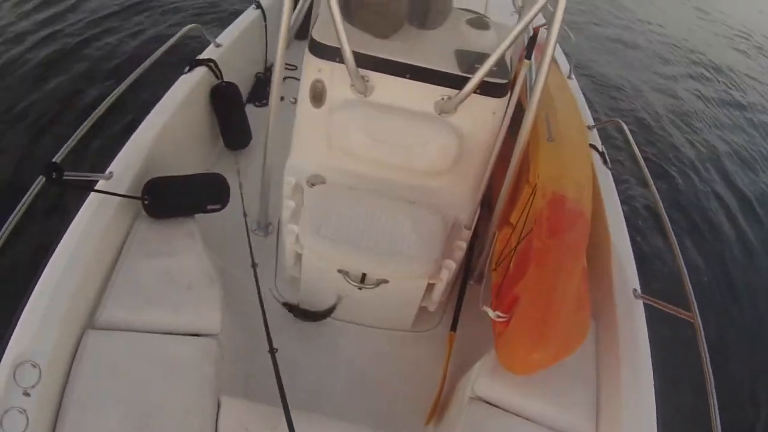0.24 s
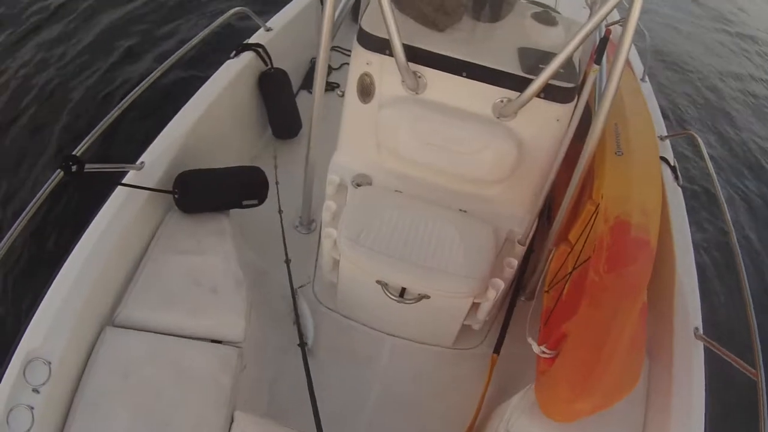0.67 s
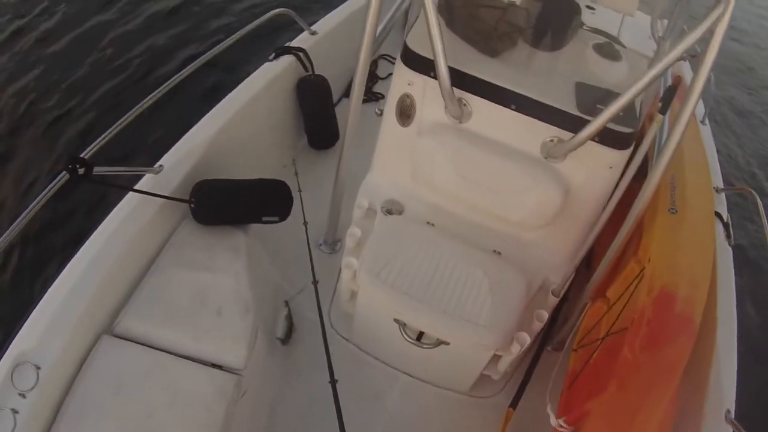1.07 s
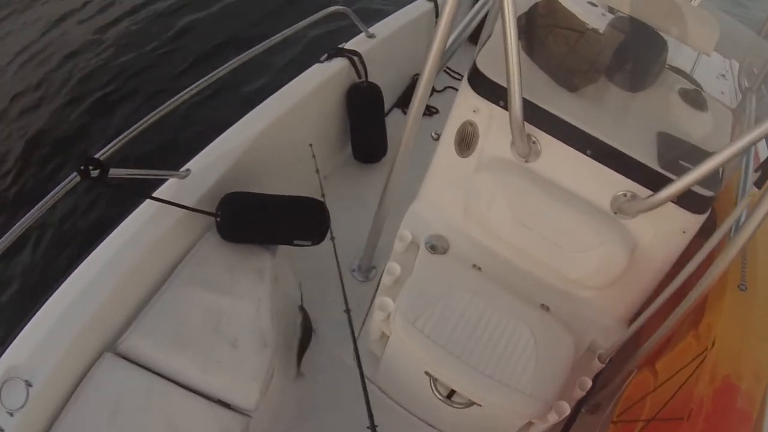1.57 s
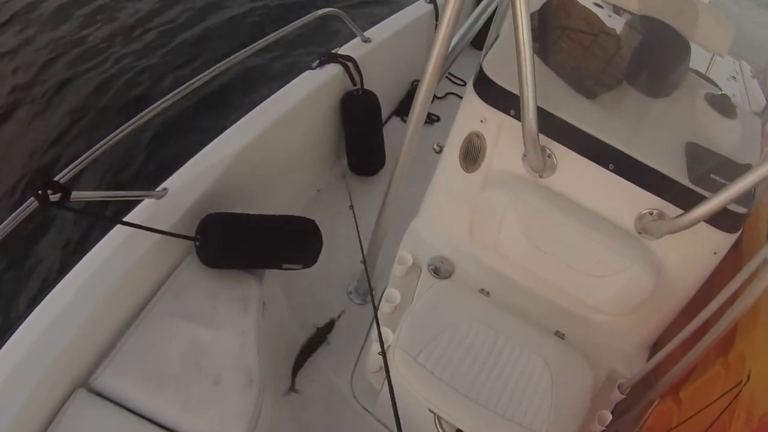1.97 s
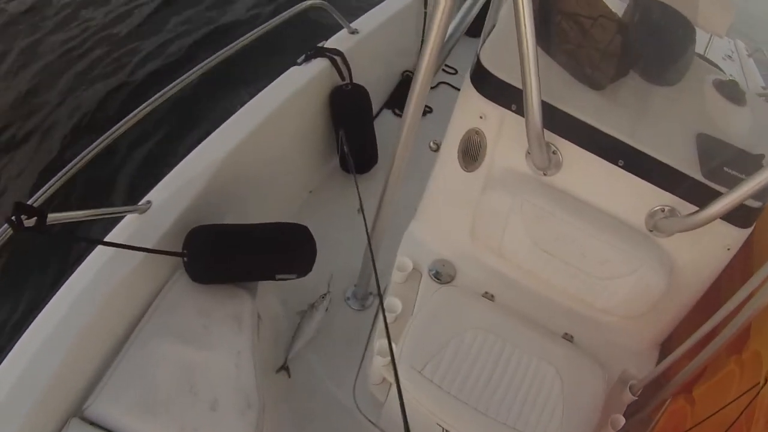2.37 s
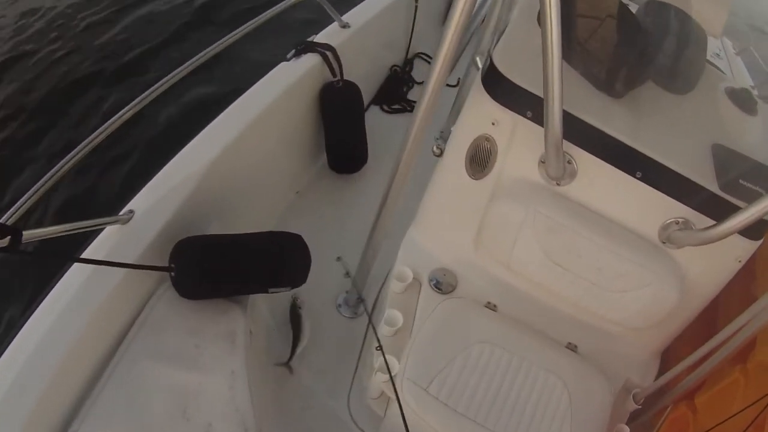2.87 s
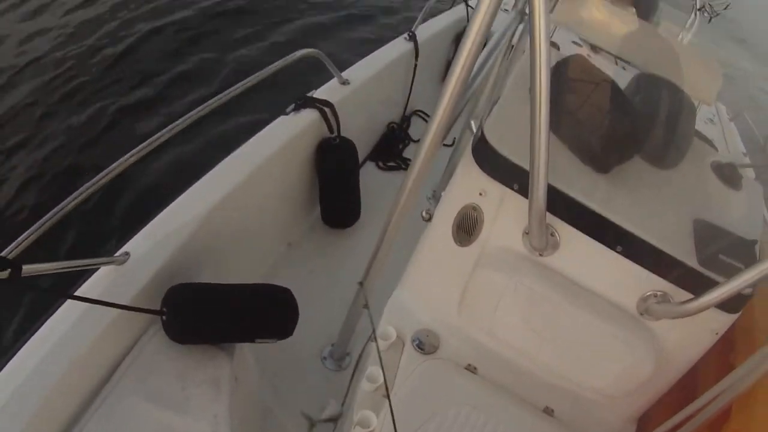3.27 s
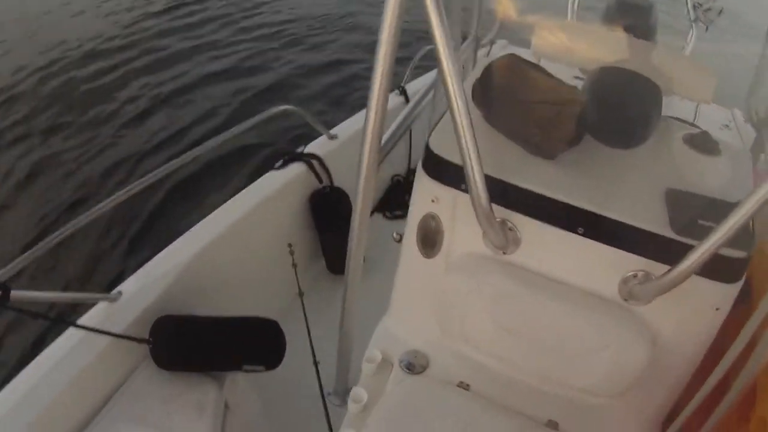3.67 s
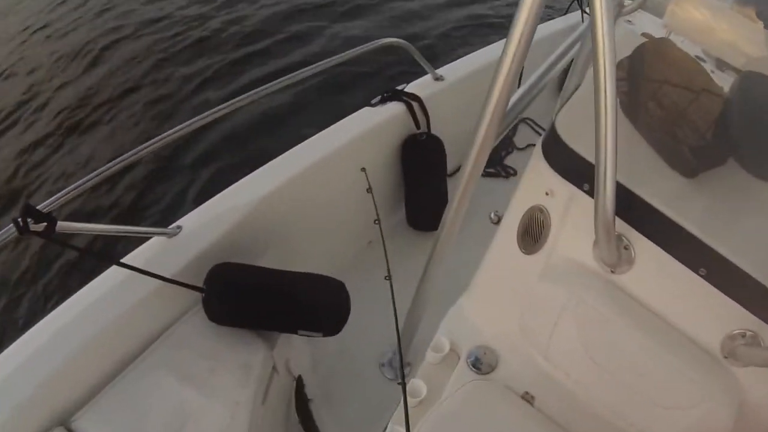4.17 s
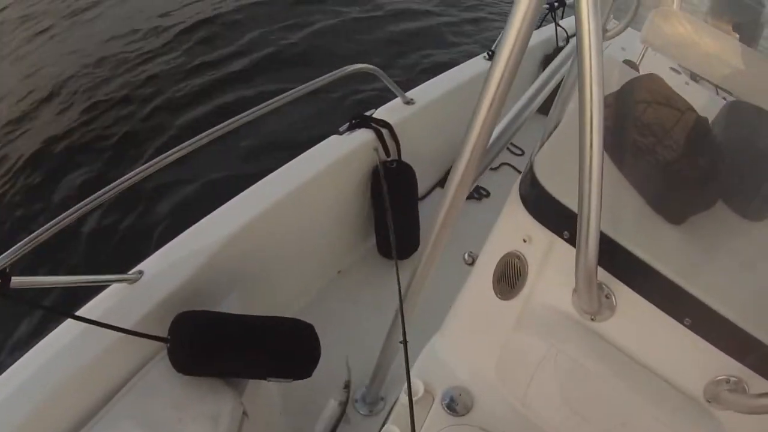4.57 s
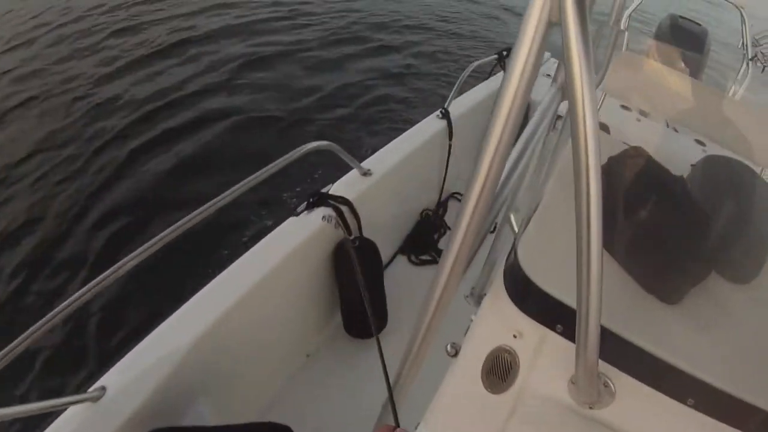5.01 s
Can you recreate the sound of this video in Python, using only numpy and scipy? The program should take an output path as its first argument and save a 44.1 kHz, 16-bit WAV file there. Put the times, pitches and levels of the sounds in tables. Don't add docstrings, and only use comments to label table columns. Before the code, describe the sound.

A freshly landed fish thrashes on the hollow fiberglass deck of a small boat, heard closely but muffled and boxy through a closed, body-worn camera housing. Lumpy sub-bass engine rumble, soft water wash on the hull and faint, slightly wide hiss continue throughout. From 0.1 to 0.6 s there are light bony taps, soft hollow thuds and a faint scrape. Small wet slaps start around 1.0 s, then a full fall lands at 1.2 s with a loud, hard smack, followed by slaps and a deep thud until 1.8 s. A lull holds only sparse taps near 2.4 and 2.9 s. At 3.4 s hard slaps and scrapes return; two heavy low bumps at about 3.55 and 3.63 s jolt the mount, with a click and faint high ping. A slap lands at 3.9 s, taps at 4.1-4.2 s, bright wet slaps with thin metal pings around 4.5-4.8 s, and a last deep bump near 4.97 s.

```python
import sys
import numpy as np
from scipy import signal
from scipy.fft import rfft, irfft
from scipy.io import wavfile
from scipy.ndimage import uniform_filter1d

SR = 44100
rng = np.random.default_rng(int(sys.argv[2]) if len(sys.argv) > 2 else 0)


def to_wav(sig):
    pcm = np.clip(np.atleast_2d(sig), -1, 1) * 32767
    pcm = np.round(pcm).astype(np.int16)
    wavfile.write(sys.argv[1], SR, pcm.T)


def boost(x):
    u = np.asarray(x, float) / 20
    return 10 ** u


N = 231354

# centre [Hz], width [Hz], lift [dB].
HOUSING = [(1320, 177, 8), (2030, 250, 6.5), (2342, 120, 5), (3250, 610, 1), (4740, 660, 1), (6000, 170, 1),
           (11260, 480, 4)]
# frequency [Hz], density [dB per Hz].
APART = [(60, -26), (300, -1), (1000, 0), (2000, -1.5), (3000, 1.5), (6000, -0.5), (9200, -4.5),
         (9800, -10), (13000, -18), (15000, -30)]
APART_DB = -79
# frequency [Hz], density [dB per Hz].
WASH = [(50, -38), (90, 5), (160, 0.5), (250, -3.5), (400, -5.5), (630, -8), (1000, -12), (1600, -13),
        (2600, -14.5), (4000, -18), (8000, -26), (12500, -34), (14300, -39), (15300, -43)]
# time [s], level [dB].
SEA = [(0, -57), (.2, -57), (.75, -57.5), (1.3, -59.5), (1.55, -58.5), (1.75, -55.5), (2.05, -57.5),
       (3.2, -59), (3.47, -55.5), (3.75, -59), (4.03, -58), (4.4, -60), (5.25, -59.5)]
SLOSH_DB, SLOSH_FOLLOWS = -58, 0.17
# frequency [Hz], density [dB per Hz].
SWAY = [(4.7, -29), (8.0, 2.5), (32, 4.5), (52, -2.5), (61, -12.5), (70, -19), (103, -26), (150, -29.5),
        (200, -45.5), (330, -120)]
# time [s], level [dB].
IDLE = [(0, -51), (1.7, -55), (1.9, -48.5), (3.2, -48.5), (3.5, -48.5), (5.25, -50.5)]
# centre [s], level [dB], half length [s].
HEAVES = [(.18, -47.5, .06), (.38, -40.5, 0.039), (.6, -42.5, 0.032), (.92, -43.5, 0.064),
          (1.14, -49, 0.037), (1.32, -45.5, 0.087), (1.7, -43.5, 0.077), (2.96, -44.5, 0.033),
          (3.3, -41, 0.093), (3.6, -37.5, .12), (3.83, -41, 0.032), (3.98, -44.5, .04), (4.07, -44.5, .05),
          (4.33, -45.5, 0.083), (4.75, -43, 0.18), (4.98, -34.5, 0.042), (5.14, -42, 0.031)]
# centre [s], level [dB], half length [s].
HUM = [
    (2.83, -65, 0.27),
    (3.95, -60, 0.083),
    (3.5, -68, .3),
    (4.8, -70, 0.54),
]
HUM_HZ = 159
# start [s], level [dB], rise [s], t60 [s], pitch [Hz].
PINGS = [
    (3.556, -56, 0.027, 0.13, 11150),
    (3.56, -63, .02, 0.1, 10950),
    (4.714, -57, .008, .2, 4470),
    (4.741, -50, .012, 0.17, 4480),
    (4.765, -52.5, 0.0092, .22, 4462),
    (4.712, -67, .005, .2, 12450),
    (4.785, -60, .01, .08, 5900),
]
# centre [s], level [dB], rate [Hz], direction.
JOLTS = [(1.266, -39.5, 91, -1), (1.359, -35.5, 33.4, 1), (2.325, -40, 140, -1), (3.251, -34.5, 30, 1),
         (3.278, -36, 126, 1), (3.542, -32, 70, 1), (3.698, -23, 27.8, 1), (3.715, -39, 30, -1),
         (3.842, -31.5, 28.8, 1), (4.951, -32, 30, 1), (5.021, -33.5, 35, 1)]
# start [s], drop [dB], drop [Hz], rebound [dB], rebound [Hz].
BUMPS = [
    (3.5512, -22.5, 45.6, -13.5, 31.6),
    (3.6311, -12, 41.7, -11, 35.8),
    (4.967, -21, 36.4, -14, 35.2),
]
REBOUND_S = 0.016
# time [s], tick [dB], kink [dB], direction.
TICKS = [
    (3.631, -44, -19.5, -1),
    (3.648, -48, -21.5, 1),
]
# frequency [Hz], level [dB].
SPLAT = [(250, -36), (500, 0), (850, 0.5), (1500, -0.5), (3000, -3), (4000, -10.5), (6000, -12),
         (10000, -30), (15000, -44)]
# start [s], length [s], level [dB], treble [dB].
SLIDES = [
    (3.475, 0.049, -52, -9),
    (3.665, 0.072, -55.5, -33),
    (1.005, 0.037, -55.5, -11),
    (4.735, 0.044, -58, -7),
    (4.885, 0.028, -58, -21),
    (.205, 0.051, -56, -9),
    (3.41, 0.032, -54, -29),
]
# frequency [Hz], level [dB], t60 [s].
DECK = [(869, -3, 0.048), (1220, -4, 0.09), (1380, -13.5, 0.038), (1760, -2, 0.049), (1825, -8, 0.054),
        (1914, -2.5, .06), (2050, -2, 0.081), (2230, -7, 0.06), (2375, -1, 0.059), (2885, -3, 0.044),
        (3226, -5, 0.042), (5700, -2, .011), (6020, -8.5, .018)]
# start [s], peak [dB], pitch [Hz], t60 [s].
THUDS = [
    (0.115, -43.5, 268, 0.089),
    (0.212, -38, 250, 0.045),
    (0.562, -38.5, 246, 0.047),
    (1.334, -35.5, 406, 0.04),
    (1.83, -33.5, 112, 0.022),
    (2.536, -44, 159, 0.035),
    (3.441, -44.5, 533, 0.11),
    (3.489, -44, 518, 0.084),
    (4.744, -47, 604, 0.081),
    (4.923, -45, 542, 0.057),
]
# start [s], peak [dB], ring [Hz], treble [dB].
TAPS = [(0.1182, -43, 1380, -13), (0.1775, -39.5, 1320, -17), (0.328, -44, 1320, -30),
        (0.5667, -40, 1276, -27), (1.5974, -41.5, 1295, -15), (2.39, -44, 2030, -30),
        (2.9326, -40.5, 1460, -10), (4.1005, -39.5, 1240, 2), (4.2145, -36, 2350, -12),
        (4.875, -39, 1940, -16), (5.207, -46.5, 2450, -17)]
TAP_RING_DB, TAP_T60_S = 0, 0.055
# start [s], peak [dB], ring [Hz], treble [dB].
SLAPS = [(0.2146, -41, 1360, -4), (1.007, -41.5, 1340, -8), (1.0239, -40.5, 2390, -14),
         (1.078, -43.5, 2180, 7), (.852, -48.5, 2190, 6), (1.2372, -34, 1350, -14),
         (1.337, -36, 1220, -10.5), (1.369, -38.5, 2074, -11), (1.5676, -34.5, 1453, -13.5),
         (1.823, -43.5, 1380, -22), (2.8994, -48, 1120, 2), (3.445, -32.5, 1340, -11),
         (3.5, -46, 1700, -18), (3.902, -32, 1260, -15), (3.9334, -42, 1320, 0),
         (4.5304, -34.5, 2105, -1.5), (4.684, -41, 2130, -2), (4.711, -40, 2050, 2),
         (4.7431, -41.5, 1920, 4), (4.926, -46, 1500, -2), (5.0221, -44.5, 2310, -11),
         (4.207, -42, 2510, -14)]
SLAP_RING_DB, SLAP_T60_S = -7.5, 0.078
# start [s], peak [dB], ring [Hz], ring share [dB], t60 [s].
FALL = [
    (1.212, -18.5, 2030, -3, 0.05),
    (1.2174, -23, 2000, -4, 0.095),
]
FALL_TREBLE_DB = -13.5
RING_SHARE, RING_ROUGH = 0.44, 0.39


def evened(x):
    return x / np.sqrt(np.mean(x ** 2) + 1e-20)


def smooth_twice(x, size):
    return uniform_filter1d(uniform_filter1d(x, size), size)


def read(points, hz):
    f, value = np.transpose(points)
    return np.interp(np.log(hz + 1), np.log(f + 1), value)


def curve(rows, t):
    rows = np.asarray(rows)
    return np.interp(t, rows[:, 0], rows[:, 1])


def add(mix, s, sound):
    part = mix[round(s * SR):][:len(sound)]
    part += sound[:len(part)]


def onset(t, rise_s):
    return 1 - np.exp(-t / rise_s)


def noise(field_db, size):
    hop = size // 4
    hz = np.fft.rfftfreq(size, 1 / SR)
    t = np.arange(N // hop + 5) * hop / SR
    a, b = rng.standard_normal((len(t), len(hz), 2)).T
    spectra = (a + 1j * b) * boost(field_db(hz[:, None], t))
    return signal.istft(spectra, nperseg=size, noverlap=size - hop)[1][:N]


def band_rms(db, hz, lo_hz, hi_hz):
    return 10 * np.log10(np.sum(boost(2 * db) * (hz > lo_hz) * (hz < hi_hz)))


def housing_db(hz):
    return sum(db / (1 + (2 * (hz - f) / width) ** 2) for f, width, db in HOUSING)


def swells(rows, t):
    return sum(boost(2 * db) * np.exp(-((t - s) / half_s) ** 2) for s, db, half_s in rows)


def shaking_db(t):
    return 10 * np.log10(boost(2 * curve(IDLE, t)) + swells(HEAVES, t))


def circuit_noise():
    return boost(APART_DB) * evened(noise(lambda hz, s: read(APART, hz) + 0 * s, size=1024))


def wash():
    def field_db(hz, t):
        shape_db = read(WASH, hz) + housing_db(hz)
        patches = rng.standard_normal((len(t), len(hz))).T
        patches = evened(uniform_filter1d(uniform_filter1d(patches, 12, 0), 12, 1))
        flicker = evened(uniform_filter1d(rng.standard_normal(len(t)), 3))
        high_db = curve(SEA, t) - band_rms(shape_db, hz, 900, 4000)
        slosh_db = SLOSH_DB + SLOSH_FOLLOWS * (uniform_filter1d(shaking_db(t), size=25) + 48.5)
        low_db = slosh_db - band_rms(shape_db, hz, 150, 700)
        far = np.clip(np.log(hz / 4100 + 1e-9) / 0.46, 0, 0.9)
        high_db = high_db - far * (high_db - np.median(high_db))
        low = 1 / (1 + (hz / 750) ** 4)
        return shape_db + low * low_db + (1 - low) * high_db + 1.1 * patches + 0.79 * flicker
    return boost(-1.5) * noise(field_db, size=1024)


def engine():
    t = np.arange(N) / SR
    shake = evened(noise(lambda hz, s: read(SWAY, hz) - 80 * (hz > 160) + 0 * s, size=8192))
    shake /= (uniform_filter1d(shake ** 2, 5000) + 0.3) ** 0.13
    drift = evened(smooth_twice(rng.standard_normal(N), 4000))
    hum = np.sin(2 * np.pi * np.cumsum(HUM_HZ + 5.23 * drift) / SR)
    return boost(shaking_db(t)) * shake + np.sqrt(swells(HUM, t)) * hum


def tackle():
    out, t = np.zeros(N), np.arange(12000) / SR
    for s, db, rise_s, t60_s, hz in PINGS:
        add(out, s, onset(t, rise_s) * boost(db - 60 * t / t60_s) * np.sin(2 * np.pi * hz * t))
    return out


def mount():
    out, t = np.zeros(N), np.arange(N) / SR
    drops = [(s, db, hz, -1) for s, db, hz, _, _ in BUMPS]
    rebounds = [(s + REBOUND_S, db, hz, 1) for s, _, _, db, hz in BUMPS]
    for s, db, hz, direction in JOLTS + drops + rebounds:
        u = (np.pi * hz * (t - s)) ** 2
        out += np.sign(direction) * boost(db) * (1 - 2 * u) * np.exp(-u)
    return out


def splat(treble_db, chance):
    hz = np.fft.rfftfreq(len(chance), 1 / SR)
    top = 1 / (1 + (3800 / (hz + 1)) ** 4)
    colour = rfft(chance) * boost(read(SPLAT, hz) + housing_db(hz) + (treble_db + 11) * top)
    both = np.array([irfft(colour * (1 - top), len(chance)), irfft(colour * top, len(chance))])
    return both / np.std(both.sum(0))


def stops():
    out, t = np.zeros(N), np.arange(N) / SR
    short = t[:1000]
    for (s, db, kink_db, direction), chance in zip(TICKS, rng.standard_normal((len(TICKS), 1000))):
        cusp = np.sqrt((t - s) ** 2 + 0.00055 ** 2) / 0.0029
        out += np.sign(direction) * boost(kink_db) * (1 - 0.5 * cusp) * np.exp(-cusp)
        tick = splat(-19.0, chance).sum(0) + 0.3 * uniform_filter1d(chance, size=3)
        add(out, s - 0.002, boost(db + 8) * tick * short / 0.0013 * np.exp(-short / 0.0015))
    return out


def slides():
    out = np.zeros(N)
    chances = rng.standard_normal((len(SLIDES), 4000))
    for (s, length_s, db, treble_db), chance in zip(SLIDES, chances):
        scrape = splat(treble_db, chance).sum(0)[:round(length_s * SR)]
        add(out, s, boost(db) * scrape * signal.windows.hann(len(scrape)))
    return out


def thud(db, hz, t60_s, chance):
    t = np.arange(len(chance)) / SR
    wobble = 1 + 0.5 * evened(smooth_twice(chance, 90))
    cycles = hz * (t + 0.0015 * onset(t, 0.0021))
    return boost(db + 3.5 - 60 * t / t60_s) * np.sin(2 * np.pi * cycles) * wobble * onset(t, 0.0048)


def deck_modes(t, chance):
    out = np.zeros(len(t))
    for (hz, db, t60_s), phase in zip(DECK, chance):
        tone = np.sin(2 * np.pi * hz * t + 0.8 * phase)
        out += boost(db - 60 * t / t60_s) * tone * onset(t * (hz / 1000) ** 2, 0.005)
    return out


def slap(db, ring_hz, ring_db, treble_db, t60_s, chance):
    t = np.arange(len(chance)) / SR
    middle, treble = splat(treble_db, chance)
    middle = middle * boost(-60 * t / t60_s) * onset(t, 0.0027)
    treble = treble * boost(-60 * t / (0.8 * t60_s)) * onset(t, 0.00087)
    ring = boost(ring_db + 2.5 - 60 * t / (RING_SHARE * t60_s)) * np.sin(2 * np.pi * ring_hz * t)
    ring = ring * onset(t, 0.0021) * (1 + RING_ROUGH * evened(smooth_twice(chance, 30)))
    hard = boost(min(db + 12.5, 0) - 2)
    crackle = 0.37 * (middle / (1 + 1.3 * hard) + treble)
    panel = hard * deck_modes(t, chance) * onset(t, 0.00068)
    clear = np.sqrt(max(1 - boost(2 * (-50 - db)), 0.05))
    return boost(db) * clear * (crackle + ring + panel)


def fish():
    out = np.zeros(N)
    for (s, *blow), chance in zip(THUDS, rng.standard_normal((len(THUDS), 6000))):
        add(out, s, thud(*blow, chance))
    blows = [(s, db, hz, TAP_RING_DB, treble_db, TAP_T60_S) for s, db, hz, treble_db in TAPS]
    blows += [(s, db, hz, SLAP_RING_DB, treble_db, SLAP_T60_S) for s, db, hz, treble_db in SLAPS]
    blows += [(s, db, hz, ring_db, FALL_TREBLE_DB, t60_s) for s, db, hz, ring_db, t60_s in FALL]
    for (s, *blow), chance in zip(blows, rng.standard_normal((len(blows), 6000))):
        add(out, s - 0.001, slap(*blow, chance))
    return out


def scene():
    knocks = stops()
    mid = wash() + engine() + tackle() + mount() + knocks + slides() + fish()
    side = circuit_noise()
    side += boost(-11) * (np.roll(knocks, 40) - knocks)
    return np.array([mid + side, mid - side])


def top_cut(x):
    return signal.sosfilt(signal.butter(12, 15230, fs=SR, output="sos"), x)


def record(dry):
    return top_cut(dry)


dry = scene()
out = record(dry)
to_wav(out)
```